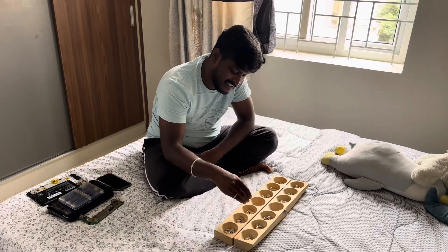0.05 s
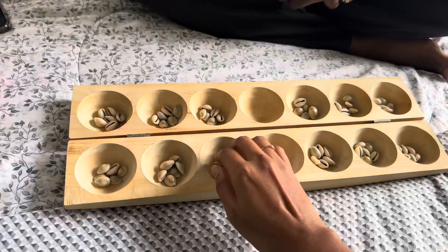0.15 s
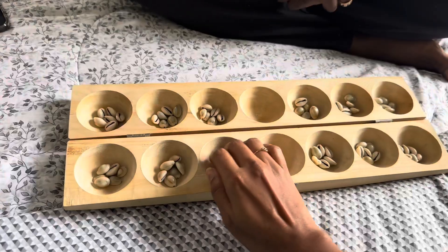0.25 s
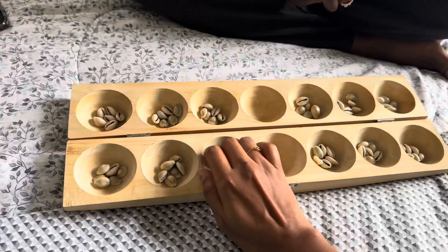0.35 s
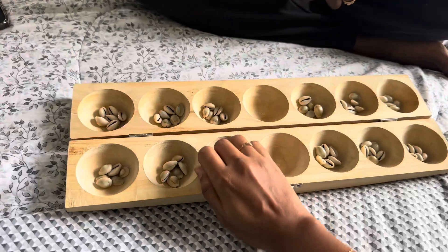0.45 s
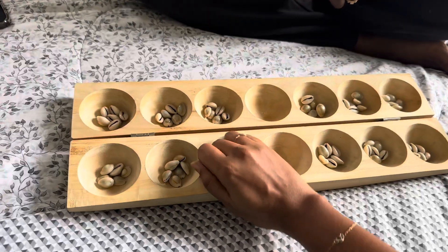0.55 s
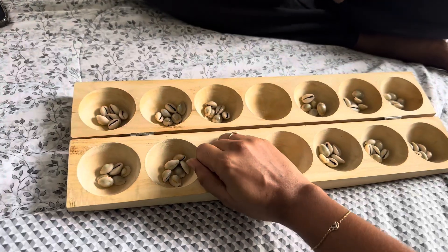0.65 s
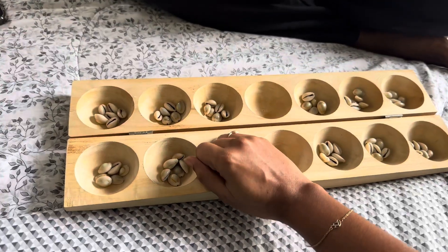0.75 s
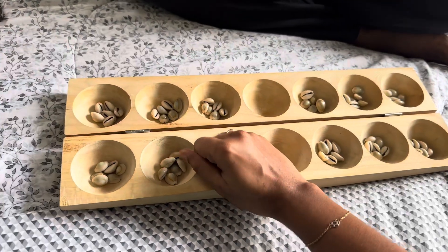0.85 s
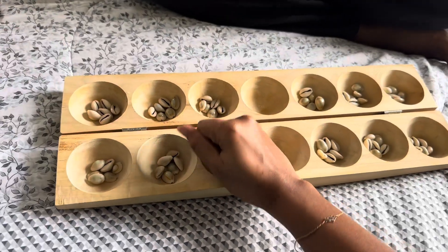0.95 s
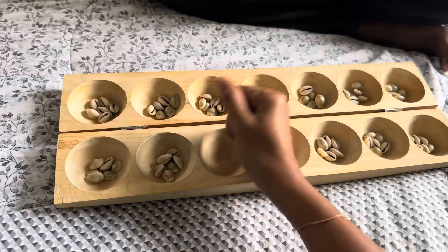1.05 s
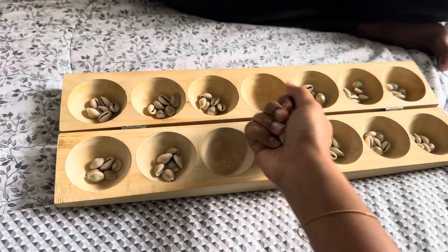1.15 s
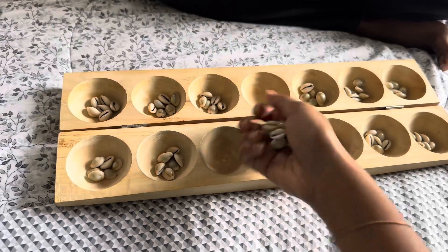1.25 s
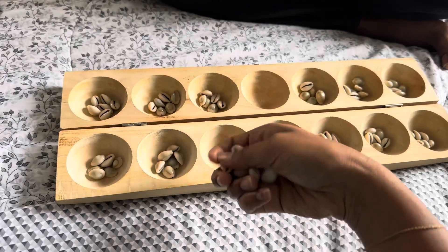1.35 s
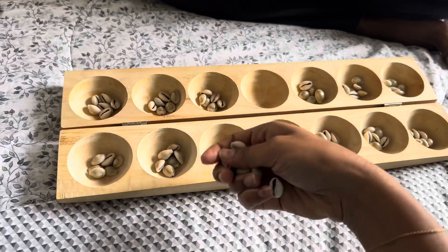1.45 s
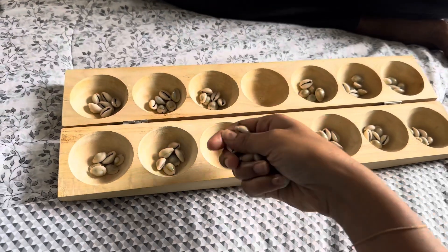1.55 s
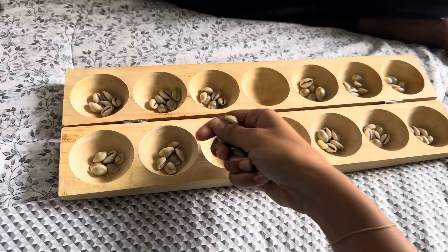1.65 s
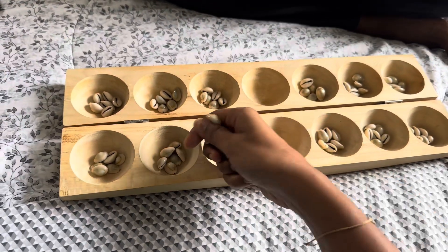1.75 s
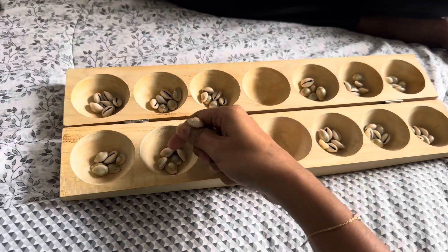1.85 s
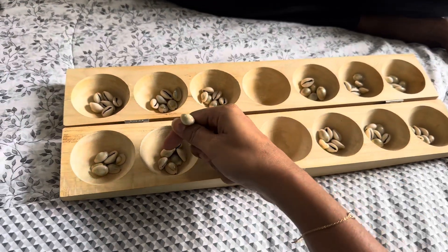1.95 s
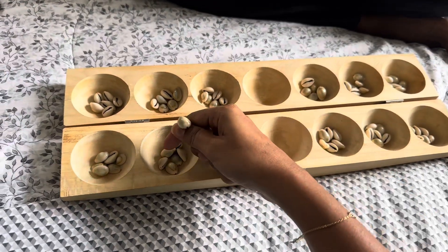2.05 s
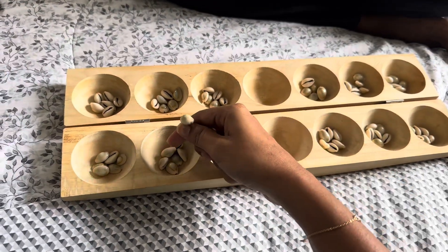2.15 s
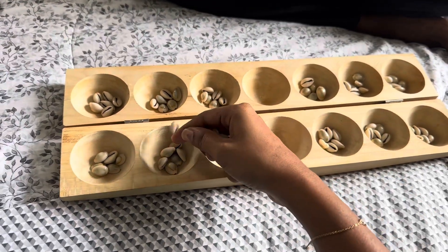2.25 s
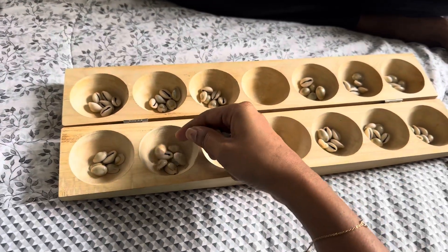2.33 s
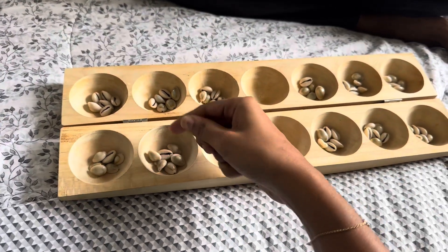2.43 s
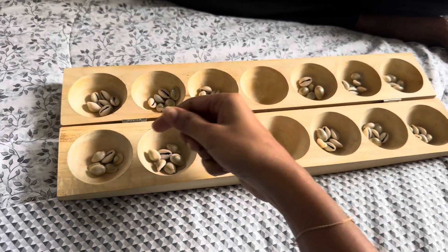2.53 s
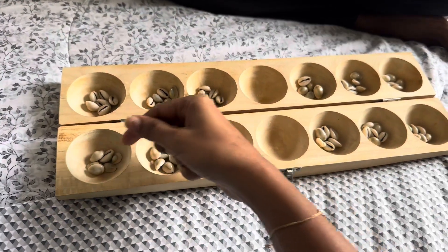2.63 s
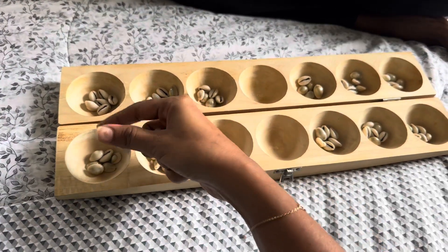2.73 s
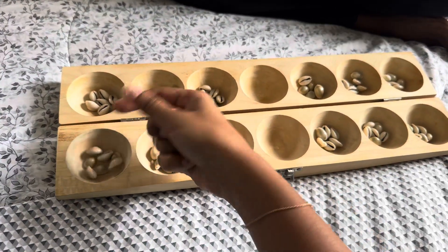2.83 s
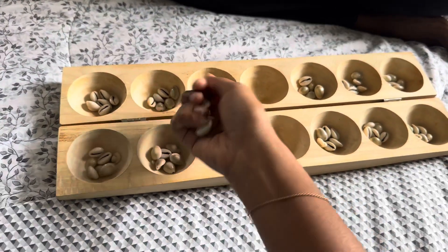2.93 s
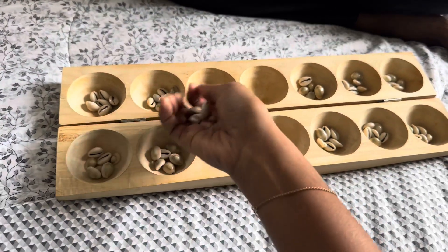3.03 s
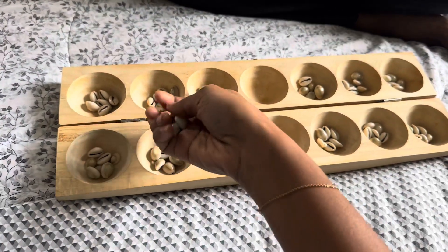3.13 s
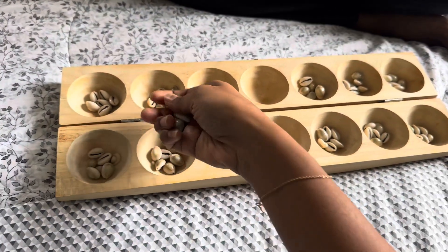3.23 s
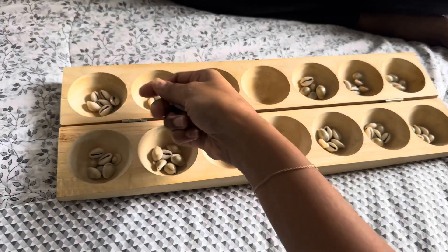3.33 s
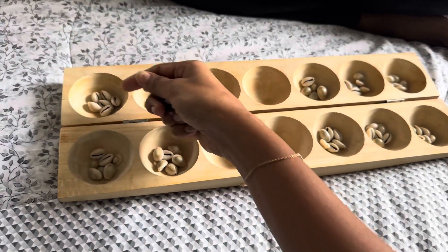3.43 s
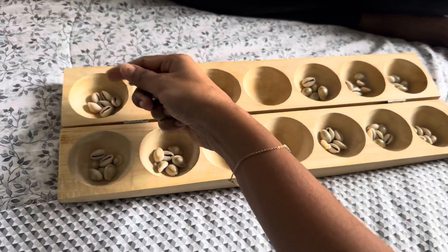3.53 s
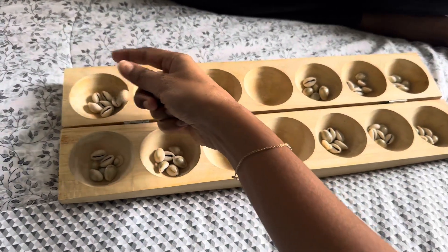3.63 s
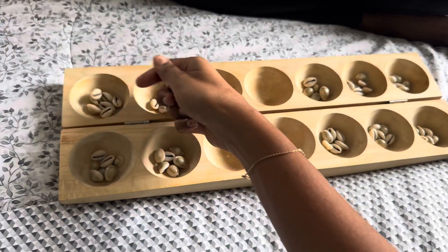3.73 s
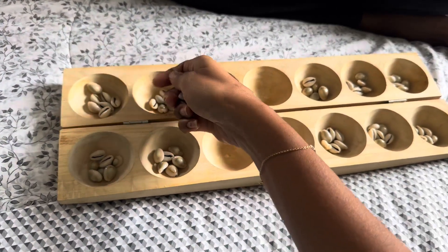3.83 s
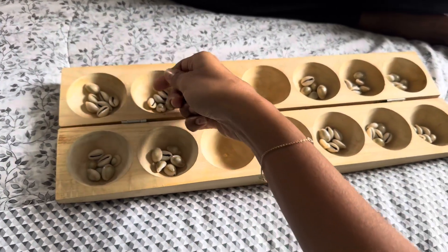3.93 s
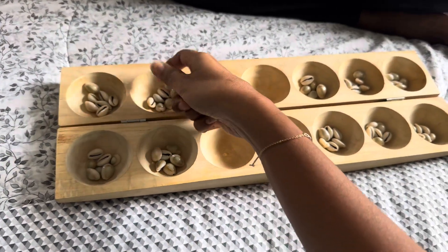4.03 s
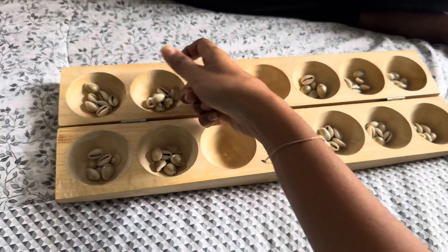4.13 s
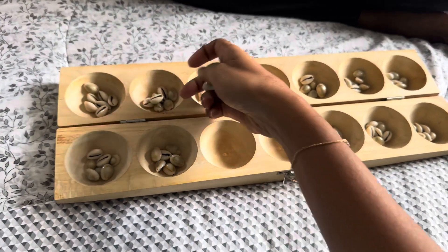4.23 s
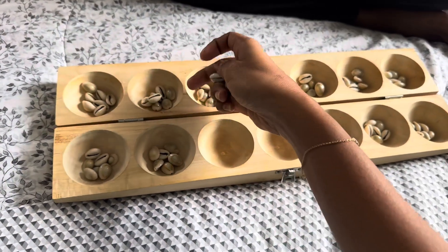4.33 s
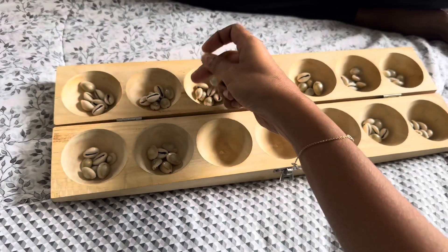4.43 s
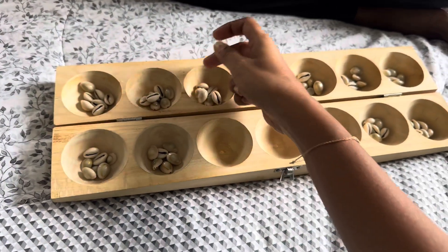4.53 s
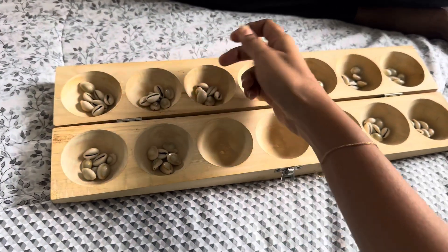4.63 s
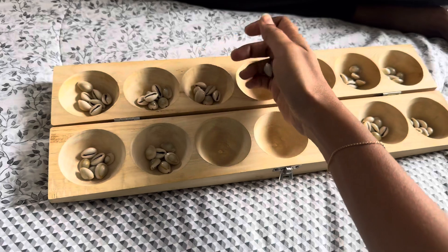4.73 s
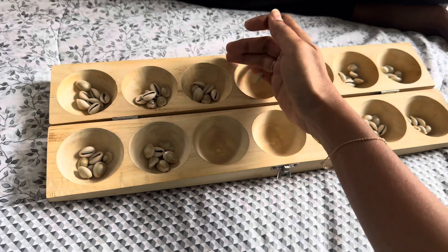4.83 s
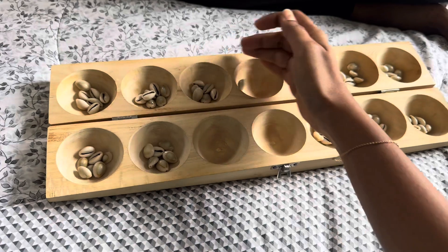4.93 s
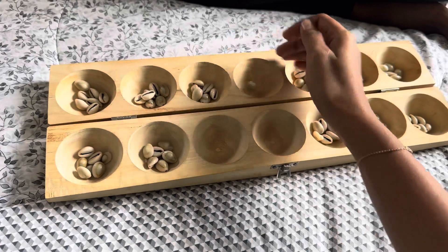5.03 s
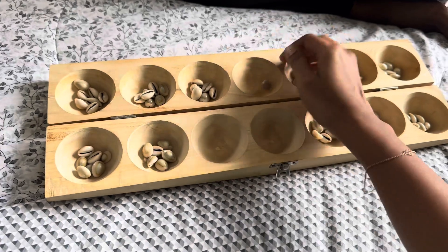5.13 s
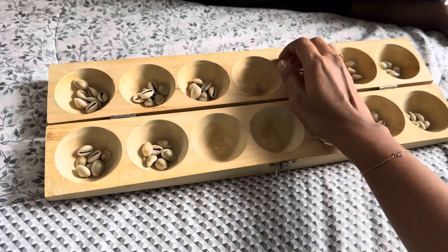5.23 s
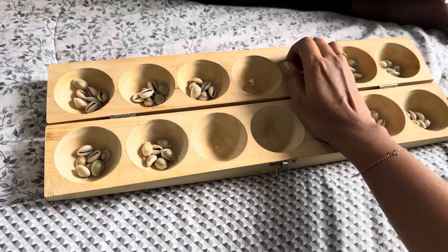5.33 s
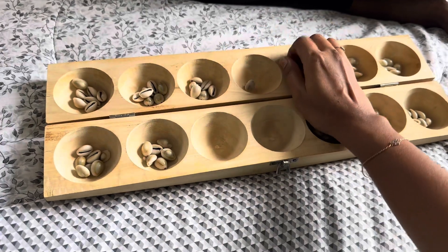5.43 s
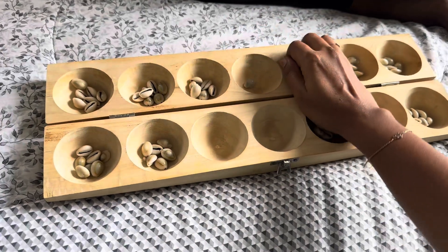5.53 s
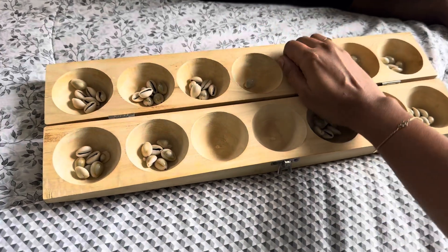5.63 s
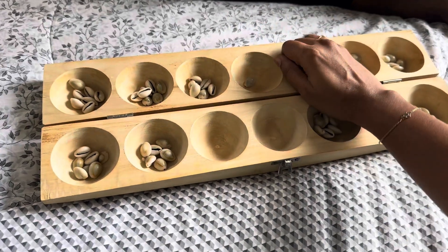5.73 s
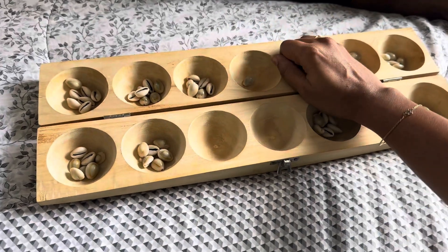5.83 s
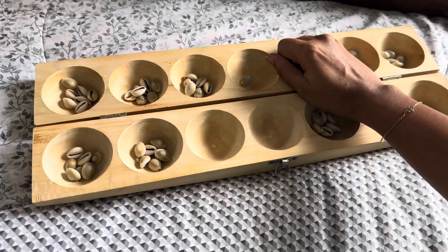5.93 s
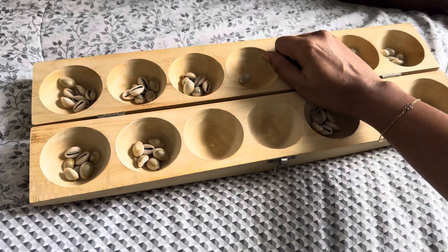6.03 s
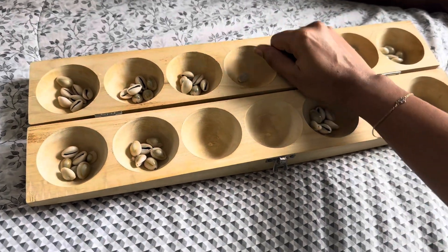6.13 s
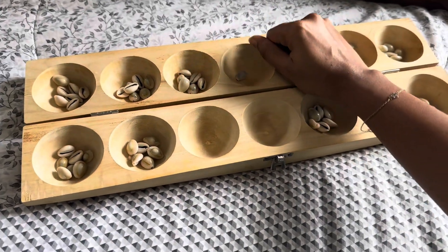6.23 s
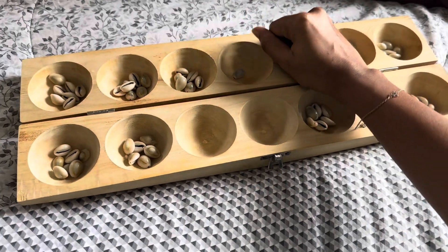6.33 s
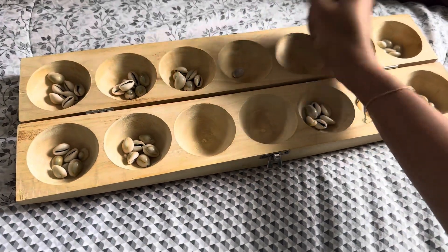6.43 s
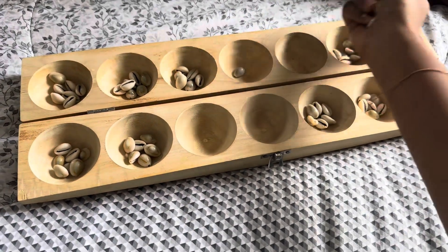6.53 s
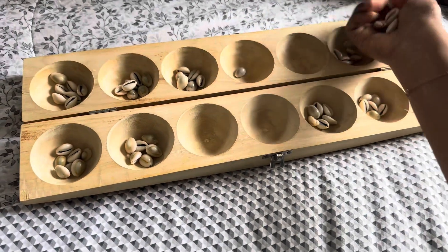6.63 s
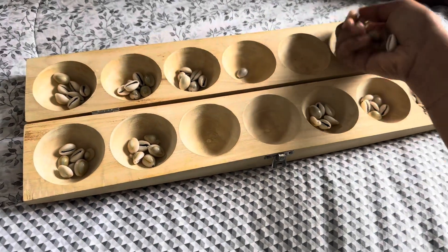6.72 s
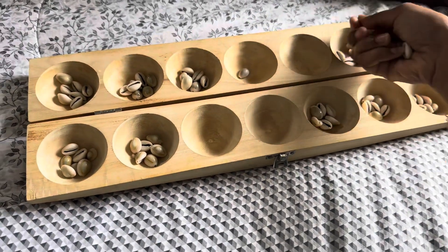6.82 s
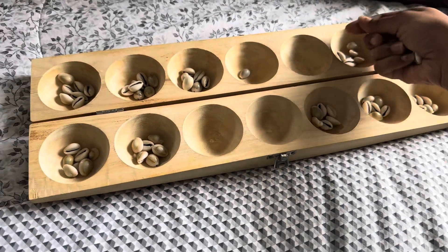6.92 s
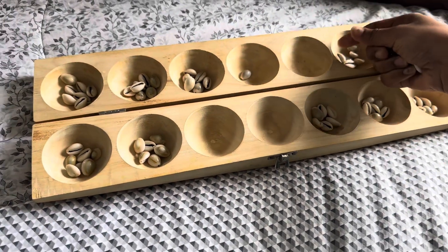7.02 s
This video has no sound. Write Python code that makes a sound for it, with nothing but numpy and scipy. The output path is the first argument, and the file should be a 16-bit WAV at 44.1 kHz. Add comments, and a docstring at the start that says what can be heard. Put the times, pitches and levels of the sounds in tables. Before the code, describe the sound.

Close stereo pickup in a small, softly furnished bedroom with a low fan hum. After a faint cut-off rub, fingers scrape cowrie shells from a wooden pit; the shells jostle in the hand, then drop singly with bright clicks and short woody knocks. One drop is clearly loudest, and a shell briefly rolls. Later the fingers scrape again and a tight cluster of clacks follows.

```python
"""Over fan hum, rumble and moving air (filtered noise and wavering tones), a distant rubbing opens; at 0.17 s
the sound breaks off. Cowrie shells are then scooped from a pit of a wooden board (stick-slip impulses),
knocking and clacking (damped modes and noise bursts). The hand bumps the board, shells jostle in it and drop
one by one into pits; one rolls. From 5.3 s the fingers scrape again, and a last cluster of clacks follows. A
small bedroom answers the shells and the hand with decaying diffuse noise."""
import sys
import numpy as np
from scipy import signal
from scipy.fft import rfft, irfft, next_fast_len
from scipy.io import wavfile
from scipy.ndimage import uniform_filter1d, map_coordinates

SR = 44100
rng = np.random.default_rng(int(sys.argv[2]) if len(sys.argv) > 2 else 0)


def persist_wave(psi):
    """Save psi, clipped to +-1, as 16-bit WAV."""
    counts = np.round(np.clip(psi, -1, 1) * 32767).astype(np.int16)
    wavfile.write(sys.argv[1], SR, np.atleast_2d(counts).T)


N = 311919


def amp(db):
    """Level law: decibels to amplitude ratio."""
    return 10 ** (np.asarray(db) / 20)


def unit(x):
    """Power normalisation: scale to rms 1."""
    return x / np.sqrt(np.mean(x ** 2) + 1e-20)


def crest(x):
    """Short-time power normalisation: the loudest millisecond gets rms 1."""
    power = uniform_filter1d(x ** 2, size=SR // 1000, mode="constant")
    return x / np.sqrt(power.max())


def along(points, hz):
    """Logarithmic frequency scale: interpolate (f/Hz, value) points on it."""
    f, value = np.transpose(points)
    return np.interp(np.log(hz + 1), np.log(f), value)


def envelopes(rows):
    """Amplitude envelope: a gain per sample for each dB column, silent outside the rows."""
    s, *columns = np.transpose(rows)
    t = np.arange(N) / SR
    return [amp(np.interp(t, s, db, left=-150, right=-150)) for db in columns]


def wobble(rate):
    """Slow random modulation: a smooth curve with rate random knots a second."""
    knots = rng.standard_normal(int(N * rate / SR) + 4)
    return map_coordinates(knots, [np.arange(N) * rate / SR])


def filtered(x, response):
    """Linear filtering: multiply the spectrum by a response of frequency."""
    n = x.shape[-1]
    padded = next_fast_len(n + 8192)
    spectrum = rfft(x, padded) * response(np.fft.rfftfreq(padded, 1 / SR))
    return irfft(spectrum, padded)[..., :n]


def coloured(x, spectrum):
    """Spectral shaping: x with the given (f/Hz, level/dB) curve, at rms 1."""
    return unit(filtered(x, lambda hz: amp(along(spectrum, hz))))


# Diffuse field at two close ports: f/Hz, left-right correlation
CORRELATION = [(100, 0.99), (250, 0.059), (600, -0.7), (2200, 0.24), (5000, -0.13), (9000, 0.39),
               (15000, 0.91)]


def diffuse(size):
    """Diffuse-field coherence: white stereo noise arriving from all sides at two close ports."""
    def mid_side(hz):
        correlation = np.clip(along(CORRELATION, hz), -1, 1)
        return np.sqrt([(1 + correlation) / 2, (1 - correlation) / 2])
    mid, side = filtered(rng.standard_normal((2, size)), mid_side)
    return np.array([mid + side, mid - side])


def add(track, s, sound):
    """Superposition: mix a sound into the track at s seconds."""
    start = max(round(s * SR), 0)
    part = track[..., start:start + sound.shape[-1]]
    part += sound[..., :part.shape[-1]]


# Opening rubbing, envelope: t/s, level/dB
RUSTLE_LEVEL = [(0, -47.5), (.03, -49), (.1, -60.5), (.108, -46.5), (.125, -54.5), (.167, -57.5)]
# Opening rubbing, spectrum: f/Hz, level/dB
RUSTLE_SPECTRUM = [(240, -44), (400, -11), (495, -4.5), (791, -27), (1250, 0.5), (1740, -14), (3890, -3.5),
                   (7350, -14), (9960, -11), (15000, -23)]


def rustle(grain_db=2.0):
    """Friction noise: a finely grained rubbing from further off fades and swells again; at 0.17 s the sound
    breaks off."""
    grain = amp(grain_db * wobble(397))
    return envelopes(RUSTLE_LEVEL)[0] * unit(grain * coloured(diffuse(N), RUSTLE_SPECTRUM))


# Fan tones: f/Hz, level/dB relative to the hum
HUM_TONES = [(74, -15), (100.3, -1), (150.6, -8), (301, -18), (1165, -24.5)]
# Low rumble, envelope before its trim: t/s, level/dB
RUMBLE_LEVEL = [(0.0, -67), (0.08, -59), (2.77, -69), (2.87, -62), (4.19, -77), (6.08, -65), (7.01, -77),
                (7.07, -62)]
# Low rumble, spectrum: f/Hz, level/dB
RUMBLE_SPECTRUM = [(20, -36.5), (32, -23), (45, -7), (60, -0.5), (80, 2), (115, 5), (170, -12.5),
                   (260, -11), (500, -41)]
# Moving air, spectrum: f/Hz, level/dB
AIR_SPECTRUM = [(30, -26), (170, 3.5), (360, -4.5), (560, 5.5), (750, 0), (1300, -2.5), (1800, -8),
                (2600, -43), (4000, -45.5)]
# Faint hiss, envelope: t/s, level/dB
HISS_LEVEL = [(0, -73.5), (2.5, -70), (4.4, -76), (7.08, -71)]
# Faint hiss, spectrum: f/Hz, level/dB
HISS_SPECTRUM = [(1000, -6), (2000, 2), (3200, -5), (5500, -3), (7600, -10.5), (10000, -9), (14000, -37),
                 (15500, -33)]


def background(air_db=-62, rumble_trim_db=4, hum_db=-63.0, drift_rad=0.62):
    """Tonal and broadband noise: a wavering fan hum over rumble, moving air and hiss."""
    t = np.arange(N) / SR
    hum = np.zeros(N)
    for hz, db in HUM_TONES:
        waver = amp(3.2 * wobble(11))
        tone = np.sin(2 * np.pi * hz * t + drift_rad * wobble(13))
        hum += amp(db) * waver * unit(tone)
    rumble = amp(rumble_trim_db) * envelopes(RUMBLE_LEVEL)[0] * coloured(diffuse(N), RUMBLE_SPECTRUM)
    air = amp(air_db) * coloured(diffuse(N), AIR_SPECTRUM)
    hiss = envelopes(HISS_LEVEL)[0] * coloured(diffuse(N), HISS_SPECTRUM)
    return amp(hum_db) * hum + rumble + air + hiss


def struck(modes, spread, pitch=1):
    """Modal superposition: damped sines, scaled in pitch, with new strengths and slight detuning."""
    t = np.arange(SR // 5) / SR
    hz, db, t60 = np.transpose(modes)[:, :, None]
    detune, strength, sign = rng.standard_normal((3, len(modes), 1))
    decay = np.sign(sign) * amp(db + 2 * strength) * np.exp(-np.log(1000) * t / t60)
    tones = np.sin(2 * np.pi * pitch * hz * np.exp(spread * detune) * t)
    return crest(np.sum(decay * tones, 0))


def burst(spectrum, t60, rise_s, pitch=1):
    """Transient contact noise: fresh noise, its spectrum scaled in pitch, dying in milliseconds."""
    t = np.arange(SR // 5) / SR
    hz = np.fft.rfftfreq(len(t), 1 / SR)
    noise = irfft(rfft(rng.standard_normal(len(t))) * amp(along(spectrum, hz / pitch)))
    return crest(noise * np.exp(-np.log(1000) * t / t60) * (1 - np.exp(-t / rise_s)))


BEND_HZ = 150  # frequency at which a bending-wave delay is stated


def bending(colour_db, delay):
    """Bending-wave dispersion: treble first; delay (s) holds at BEND_HZ and falls as 1/sqrt(f)."""
    hz = np.fft.rfftfreq(SR // 10, 1 / SR)
    phase = np.exp(-4j * np.pi * delay * np.sqrt(BEND_HZ * hz))
    return crest(irfft(amp(colour_db(hz)) * phase))


# Shell on wood, before layer trims: t/s, level/dB, pit level/dB re board, thud level/dB re board
KNOCKS = [(0.266, -53, 4.5, -1), (0.433, -42, -10, -1.5), (0.657, -49, -26, -17), (0.756, -61, -22, -24),
          (0.835, -49.5, -18, -7), (1.176, -52, -6, -13), (2.285, -40.5, -8, -19), (2.29, -39, 0.5, -17),
          (2.314, -38.5, -1.5, -20), (2.332, -42, 4, -25), (2.798, -30, -21, -13.5), (2.881, -49.5, -8, -8),
          (3.646, -37.5, 2.5, -11), (3.718, -42.5, -16, -8.5), (3.818, -49.5, 2, -17),
          (3.838, -51, -7, -23), (4.12, -37.5, 2.5, -16.5), (4.159, -47, -12, -23.5),
          (4.192, -47, 5.5, -24), (4.502, -39.5, -15, -22), (4.558, -44.5, -9.5, -25),
          (4.882, -44, 8.5, -28), (5.046, -61, 10.5, -13), (5.185, -52, -7, -8), (5.908, -46, -24, -10),
          (5.954, -50, -17, -25), (6.171, -47.5, -10, -9.5)]
# Modes of the board: f/Hz, level/dB, T60/s
BOARD_MODES = [(463, -11, 0.072), (720, -14, .021), (955, 2.5, .03), (1182, 3.5, 0.1), (1440, -6, 0.042),
               (1700, -4.5, .04)]
# Modes of a bare pit's hollow: f/Hz, level/dB, T60/s
PIT_MODES = [(2078, -4.5, 0.13), (2197, 5.5, .02), (2920, -8, .03), (3920, -14.5, 0.12), (4060, -17, 0.19)]
# Modes of the whole board on the mattress: f/Hz, level/dB, T60/s
THUD_MODES = [(150, -4, 0.15), (202.6, -6, 0.057), (266.7, -2.5, 0.053), (358, -1.5, 0.033),
              (477, -3.5, 0.11)]
# Dry tap on wood, spectrum: f/Hz, level/dB
WOOD_SPECTRUM = [(200, -9.5), (500, -3), (1000, 1), (1600, 4.5), (3200, -7.5), (6000, -13), (13000, -35)]
# Pits in the near half ring lower, until the hand crosses to the far half
NEAR_PITCH, CROSS_S = .945, 3.4


def knocks(board_db=-6, pit_db=-4, thud_db=-1, tap_db=0, rough_db=-7, bend_s=0.0061):
    """Impact excitation: a dry tap on wood rings the board and thuds; a bare pit adds its narrow ring."""
    out = np.zeros(N)
    for s, db, hollow_db, low_db in KNOCKS:
        board = amp(board_db) * struck(BOARD_MODES, spread=0.003)
        board += amp(rough_db) * burst(WOOD_SPECTRUM, t60=0.024, rise_s=0.00018)
        pitch = NEAR_PITCH if s < CROSS_S else 1
        pit = amp(pit_db) * struck(PIT_MODES, spread=0.002, pitch=pitch)
        thud = amp(thud_db) * struck(THUD_MODES, spread=0.014)
        add(out, s, amp(db) * (board + amp(hollow_db) * pit + amp(low_db) * thud))
        tap = bending(lambda hz: along(WOOD_SPECTRUM, hz), bend_s)
        add(out, s, amp(db + tap_db) * tap)
    return out


def chink(wall_hz, t60=0.014):
    """Single-mode resonance: the wall of one small shell rings very briefly at its own pitch."""
    return struck([(wall_hz, 0, t60)], spread=0.02)


# Shells jostle or skitter, before layer trims: t/s, length/s, starting level/dB, body level/dB re snap
RATTLES = [(1.148, .069, -47.5, -14), (1.293, .06, -34, -20), (2.294, .09, -33.5, -7.5),
           (2.816, 0.055, -37.5, -1.5), (2.922, .08, -42.5, -6), (3.75, 0.096, -45.5, -2),
           (4.127, 0.065, -40, -5), (4.557, .06, -38.5, -7)]
# Pace of a rattle, loss over its length, largest deviation of a contact either way
CONTACTS_PER_S, SETTLE_DB, SCATTER_DB = 87, 4, 11
# Hollow and wall pitch of a middling shell; share by which shells differ
HOLLOW_HZ, WALL_HZ, SIZE_SPREAD = 4775, 10120, .08


def rattles():
    """Energy loss in repeated impact: uneven contacts tend to weaken; rows like those of CLACKS."""
    contacts = []
    for s, length, db, body_db in RATTLES:
        count = max(round(length * CONTACTS_PER_S), 1)
        shift, luck, size = rng.uniform(-1, 1, (3, 32))[:, :count]
        progress = (np.arange(count) + .5 + .5 * shift) / count
        pitches = 1 + SIZE_SPREAD * size
        for p, k, pitch in zip(progress, luck, pitches):
            level = db - SETTLE_DB * p + SCATTER_DB * k
            contacts.append((s + length * p, level, body_db, HOLLOW_HZ * pitch, WALL_HZ * pitch))
    return contacts


# Shell on shell, and an early echo off a wall at 4.134 s, before layer trims:
# t/s, snap level/dB, body level/dB re snap, hollow f/Hz, wall f/Hz
CLACKS = [(.3692, -41, -15, 3540, 9300), (.449, -38, -8, 4330, 10000), (.5272, -33.5, -9, 4130, 9800),
          (.5704, -38.5, -25, 4600, 10300), (.603, -31, -11.5, 6060, 10500), (.625, -42, -10, 5000, 10300),
          (.673, -41, -14, 4800, 10400), (.6887, -35.5, -16, 6300, 10700), (.7696, -39, -26, 3430, 11900),
          (.8001, -38, -14, 4900, 10100), (1.1777, -35, -4.5, 4700, 10350), (1.2613, -36, -13, 5000, 10200),
          (1.272, -30.5, -7.5, 4660, 10000), (1.2765, -25.5, -8, 4670, 9900),
          (1.2828, -34.5, -7, 4700, 10600), (1.3026, -27, 3, 6450, 10000), (1.311, -30, -2.5, 5600, 10900),
          (1.32, -30, -5, 5700, 10100), (1.34, -39, -5, 3370, 10300), (1.3454, -30.5, 0.5, 3960, 11700),
          (1.354, -33, -21, 5100, 10200), (1.6036, -42, -16, 4960, 10100), (1.6212, -44, -13, 6030, 9900),
          (1.682, -44.5, -8.5, 5900, 10360), (1.8135, -39.5, -6, 5500, 10050),
          (2.1299, -47, -2.5, 5470, 10800), (2.2875, -38, 9, 3620, 10500), (2.291, -24, -2, 4960, 8250),
          (2.311, -33, -10, 5500, 10500), (2.332, -29, -7, 4970, 10700), (2.347, -27.5, -8, 5500, 11000),
          (2.362, -32.5, 0, 4330, 10500), (2.3894, -31.5, -7.5, 4430, 9900), (2.607, -39, 2.5, 5000, 8500),
          (2.7988, -13, -5.5, 4250, 11200), (2.81, -43, -5, 4540, 11600), (2.8803, -29, -1, 5000, 11650),
          (3.0705, -31.5, -12.5, 5200, 10300), (3.1096, -23.5, -9.5, 5100, 10900),
          (3.1145, -30.5, -14, 5200, 10100), (3.122, -31, -14.5, 5150, 12700),
          (3.188, -44.5, -10, 4420, 9960), (3.2869, -46.5, -9, 4200, 9340),
          (3.3523, -35.5, -13.5, 3930, 10900), (3.368, -43.5, -4, 4710, 10040),
          (3.72, -24, -4, 4450, 10000), (3.729, -36.5, -6.5, 4560, 10600), (3.734, -30.5, -3, 4440, 10550),
          (3.8593, -58, 19.5, 4040, 10300), (3.9294, -73, 19, 3800, 9500), (4.1205, -22, -6.5, 3560, 11050),
          (4.134, -47, 16, 3410, 9100), (4.1482, -41, -8, 3430, 10840), (4.163, -33, 2, 4900, 11000),
          (4.1936, -33, -4.5, 5170, 10800), (4.21, -35, -3.5, 5240, 12200),
          (4.5006, -28.5, -9, 4950, 10300), (4.5053, -25.5, -4.5, 4790, 11270),
          (4.5506, -31.5, -4.5, 5120, 10000), (4.6199, -36, -6.5, 5200, 10500),
          (4.664, -42, -6.5, 5300, 9360), (4.8827, -24.5, -9.5, 4500, 9300), (5.185, -60, -1, 4780, 10200),
          (5.211, -49, -0.5, 4630, 10150), (5.2777, -49.5, 7, 4230, 9600), (5.4445, -39.5, -22, 5900, 9400),
          (5.469, -39.5, -24, 3200, 10200), (5.593, -33, -6.5, 6100, 10000), (5.837, -46, 0, 6300, 10200),
          (5.909, -33.5, -24, 5750, 9550), (5.957, -37, -17, 5000, 10100), (6.1708, -36.5, -8, 4550, 9250),
          (6.6504, -25, -14, 4750, 10650), (6.6565, -25.5, -14, 6350, 10200),
          (6.663, -37, -17, 5200, 10100), (6.696, -22.5, -8.5, 4850, 9900), (6.71, -34, -4, 5240, 11000),
          (6.7465, -25, -5.5, 5360, 10000), (6.755, -25.5, -11.5, 4800, 10140),
          (7.0176, -47.5, -7.5, 4400, 10000)]
# Crack of hard shell walls, spectrum for a middling shell: f/Hz, level/dB
SNAP_SPECTRUM = [(4000, -35), (6300, -8), (8200, -9.5), (9900, 2.5), (11400, -11.5), (13000, -5.5),
                 (15000, -13), (16500, -34.5)]
# Extra treble of a hard, brief contact: f/Hz, level/dB
SPLIT_SPECTRUM = [(8000, -33), (11500, -2.5), (14500, -2.5), (16500, -16)]
# Clack of a hollow shell, spectrum for a middling shell: f/Hz, level/dB
BODY_SPECTRUM = [(1500, -26.5), (2700, -6.5), (3900, -5), (4900, 7), (6000, -2.5), (8000, -12.5)]
# Modes of the mouth of a middling shell: f/Hz, level/dB, T60/s
MOUTH_MODES = [(4450, -6, 0.0024), (5200, -10, 0.017)]
# Level at which the extra treble equals the snap; dB it gains on the snap per dB below that
HARD_DB, HARD_GROWS = -10, 0.71


def clacks(snap_db=-1, body_db=-2, ring_db=-12, rebound_db=-12, rebound_s=0.0029, chink_db=-12):
    """Contact stiffness: harder blows are brighter; wall and hollow sound, and the ribs touch again at once."""
    out = np.zeros(N)
    for s, db, rel_db, hollow_hz, wall_hz in [*CLACKS, *rattles()]:
        rebound_delay = rebound_s * (0.33 + rng.random())
        for delay, level in [(0, db), (rebound_delay, db + rebound_db)]:
            hardness = amp(min(HARD_GROWS * (level - HARD_DB), 0))
            snap = burst(SNAP_SPECTRUM, t60=.0045, rise_s=.0002, pitch=wall_hz / WALL_HZ)
            snap += hardness * burst(SPLIT_SPECTRUM, t60=.0045, rise_s=.0002)
            snap += amp(chink_db) * chink(wall_hz)
            pitch = hollow_hz / HOLLOW_HZ
            body = amp(body_db) * burst(BODY_SPECTRUM, t60=0.0077, rise_s=0.00074, pitch=pitch)
            body += amp(ring_db) * struck(MOUTH_MODES, spread=0.0056, pitch=pitch)
            add(out, s + delay, amp(level) * (amp(snap_db) * snap + amp(rel_db) * body))
    return out


def slips(rate, grip):
    """Stick-slip: random impulses of widely varying size, rate a second, larger where grip is high."""
    size = rng.standard_normal(N) * amp(2.5 * grip)
    return (rng.random(N) < rate / SR) * size


# The fingers bite, ease off along the stroke, then let go
STROKE_ATTACK_S, STROKE_EASE_DB, STROKE_RELEASE_DB_PER_S = 0.0067, 3, 442


def pressure(s, length):
    """Normal force sets friction level: gain of one finger stroke, a bite, an easing and a release."""
    t = np.maximum(np.arange(N) / SR - s, 0)
    ease_db = STROKE_EASE_DB * np.minimum(t / length, 1)
    release_db = STROKE_RELEASE_DB_PER_S * np.clip(t - length, 0, 1)
    return np.minimum(t / STROKE_ATTACK_S, 1) * amp(-ease_db - release_db)


# Finger strokes, before layer trims: t/s, length/s, wood scrape level/dB, shell slide level/dB, tick level/dB
STROKES = [(0.375, 0.028, -73, -61, -51.5), (0.408, 0.082, -51.5, -52.5, -51.5),
           (0.513, 0.21, -53.5, -58, -52.5), (0.748, 0.091, -57, -69, -69),
           (0.828, 0.069, -47, -55.5, -48.5), (5.346, 0.27, -61, -63, -58.5),
           (5.58, 0.12, -64.5, -63, -54.5), (5.795, 0.022, -57, -84, -49), (5.901, 0.12, -53, -58, -53.5),
           (6.054, 0.091, -73, -62, -57), (6.163, 0.027, -54.5, -57.5, -54), (6.22, 0.079, -60.5, -82, -79),
           (6.599, 0.327, -61, -65.5, -62)]
# Shells catch and jump free: t/s, shell level/dB, wood level/dB re shell
CATCHES = [(0.404, -47, -12), (.422, -40, -6.5), (.476, -42.5, -18.5), (0.536, -42.5, -16.5),
           (0.556, -42.5, -10), (0.57, -45, -20), (.843, -50.5, 3.5), (0.874, -49, 0), (5.4727, -59, 10),
           (5.533, -59, 6), (5.8029, -54, 2.5), (5.9168, -49, 1.5), (6.008, -56, 0), (6.0614, -59, -4),
           (6.1133, -56, -16)]
# Sliding shell, spectrum for a middling shell: f/Hz, level/dB
SLIDE_SPECTRUM = [(1500, -8.5), (2600, -11.5), (3800, -5), (4700, -2), (6000, -8.5), (8000, -20)]
# Small ticks, spectrum for a middling shell: f/Hz, level/dB
TICK_SPECTRUM = [(5000, -16), (7500, 12.5), (10200, 9), (12500, -5.5), (15000, 4.5), (17000, -60)]
# Large and fine slips a second, both over all shells together; strength of the fine ones
CATCH_RATE, CREEP_RATE, CREEP_SHARE = 150, 900 * 8, 0.75


def scooping(scrape_db=-2, slide_db=0, tick_db=-1, rough_db=2, chink_db=-3,
             slide_t60=0.01, tick_t60=0.0025, count=8):
    """Stick-slip excitation: each slip of a shell under the fingers taps the wood, its hollow and its wall."""
    def wood_tap():
        rough = burst(WOOD_SPECTRUM, t60=slide_t60, rise_s=.0002)
        return struck(BOARD_MODES, spread=0.035) + amp(rough_db) * rough

    def shell_tap(pitch):
        return burst(SLIDE_SPECTRUM, t60=slide_t60, rise_s=0.00018, pitch=pitch)

    grains, grip = np.zeros((3, N)), wobble(45)
    for pitch in np.exp(SIZE_SPREAD * rng.standard_normal(count)):  # one shell size each
        train = unit(slips(CATCH_RATE / count, grip))
        train += CREEP_SHARE * unit(slips(CREEP_RATE / count, grip=0))
        tick = burst(TICK_SPECTRUM, t60=tick_t60, rise_s=0.00017, pitch=pitch)
        tick += amp(chink_db) * chink(WALL_HZ * pitch)
        taps = np.array([wood_tap(), shell_tap(pitch), tick])
        grains += signal.oaconvolve(train[None], taps, axes=1)[:, :N]
    strokes = sum(np.outer(amp(levels), pressure(s, length)) for s, length, *levels in STROKES)
    out = np.zeros(N)
    for db, stroke, layer in zip([scrape_db, slide_db, tick_db], strokes, grains):
        out += amp(db) * stroke * unit(layer)
    for s, db, wood_db in CATCHES:
        add(out, s, amp(db) * (shell_tap(1) + amp(wood_db) * crest(wood_tap())))
    return out


# Hand bumps the board: t/s, level/dB, bass delay/s at BEND_HZ, treble tilt/(dB/octave), thud level/dB re bump
BUMPS = [(1.091, -50.5, 0.0098, -9, -5.5), (5.1818, -44.5, 0.011, 0.5, -7),
         (6.1133, -41.5, 0.006, 2.5, -11)]
# Bump, spectrum before the tilt: f/Hz, level/dB
BUMP_SPECTRUM = [(60, -14), (150, 15.5), (260, 0.5), (480, 0), (700, 2), (1200, 2), (2500, -19.5),
                 (5000, -41), (9000, -42)]


def bumps():
    """Dispersion on a damped plate: the hand's bump arrives treble first, then the whole board thuds."""
    out = np.zeros(N)
    for s, db, delay, tilt_db, thud_db in BUMPS:
        def colour(hz):
            return along(BUMP_SPECTRUM, hz) + tilt_db * np.log2(1 + hz / BEND_HZ)
        add(out, s, amp(db) * bending(colour, delay))
        add(out, s + delay / 2, amp(db + thud_db) * struck(THUD_MODES, spread=0.012))
    return out


# A shell rolls round its pit, envelope: t/s, level/dB
ROLL_LEVEL = [(2.88, -63), (2.94, -55), (2.98, -53), (3.03, -77.5)]


def rolling(ring_hz=4450, width_hz=450):
    """Resonance under repeated impulses: rolling over its ribs, a shell keeps its mouth ringing."""
    ribs = filtered(slips(830, grip=0), lambda hz: 1 / (1 + ((hz - ring_hz) / width_hz) ** 2))
    return envelopes(ROLL_LEVEL)[0] * unit(ribs)


# Reverberation time of the bedroom: f/Hz, T60/s
ROOM_T60 = [(200, 0.098), (1000, 0.22), (2200, 0.21), (5000, 0.26), (10000, 0.24), (16000, 0.13)]
# Reverberation strength: f/Hz, level/dB
ROOM_LEVEL = [(200, 1.5), (1000, -5), (2200, -1), (5000, -1), (8000, -7.5), (11000, -10.5), (16000, -18)]


def room(x, build_s=0.0012):
    """Exponential reverberant decay per band; a new tail each quarter second as the hand moves."""
    out, size, step = np.zeros((2, N)), SR // 2, SR // 4
    for start in range(0, N, step):
        hz, t, bands = signal.stft(diffuse(size), SR, nperseg=256)
        decay = np.exp(-np.log(1000) * t / along(ROOM_T60, hz)[:, None]) * (1 - np.exp(-t / build_s))
        energy = size * np.mean(decay ** 2, axis=1, keepdims=True)
        decay *= amp(along(ROOM_LEVEL, hz))[:, None] / np.sqrt(energy)
        tail = signal.istft(bands * decay, SR, nperseg=256)[1]
        add(out, start / SR, signal.fftconvolve(x[None, start:start + step], tail, axes=1))
    return out


# Phase lead of the left port over the right: f/Hz, phase/rad
LEFT_LEAD = [(100, -1), (300, 0.9), (800, 2), (2400, 1.5), (4600, 1.5), (8000, 3.5), (11000, -1),
             (15000, 2)]
# The closed hand screens its shells from the walls: start t/s, end t/s
HELD = [(1.14, 1.45), (6.6, 6.95)]


def scene(covered_db=-3, held_db=-2.0):
    """Direct plus reverberant field: covering the pit or closing on the shells, the hand weakens the echo."""
    drops = clacks() + knocks() + rolling()
    handling = scooping() + bumps()
    # half the phase lead goes to each port, with opposite signs
    direct = filtered(drops + handling, lambda hz: np.exp(.5j * np.outer([1, -1], along(LEFT_LEAD, hz))))
    t = np.arange(N) / SR
    held = sum((t > start) & (t < end) for start, end in HELD)
    echo = room(amp(held_db * held) * drops + amp(covered_db) * handling)
    return direct + echo + rustle() + background()


# Sensitivity of the left port over the right: f/Hz, level/dB
LEFT_GAIN = [(60, 6.5), (2400, 4.5), (4400, 8.5), (8100, 4.5), (15000, -4)]
TOP_HZ = 16300  # upper band limit


def record(dry):
    """Port sensitivity and band limit: left is stronger below the treble; a steep low-pass ends the band."""
    ports = filtered(dry, lambda hz: amp(np.outer([.5, -.5], along(LEFT_GAIN, hz))))
    return filtered(ports, lambda hz: 1 / np.sqrt(1 + (hz / TOP_HZ) ** 160))


dry = scene()
out = record(dry)
persist_wave(out)
```